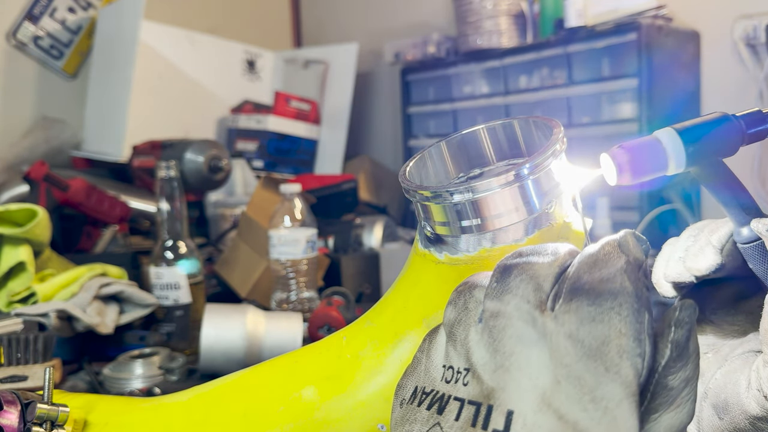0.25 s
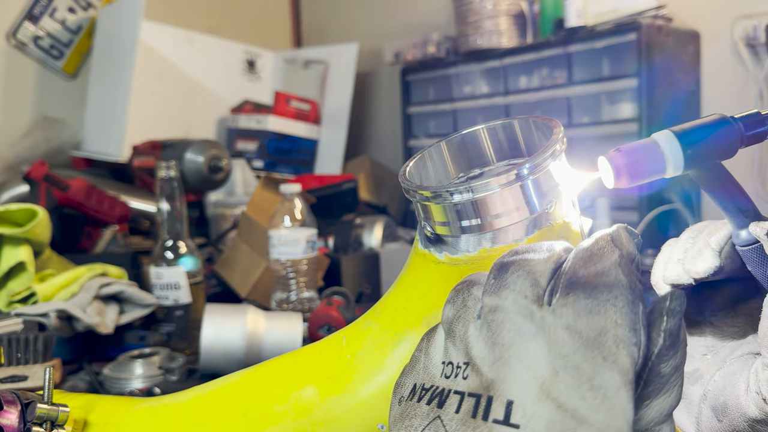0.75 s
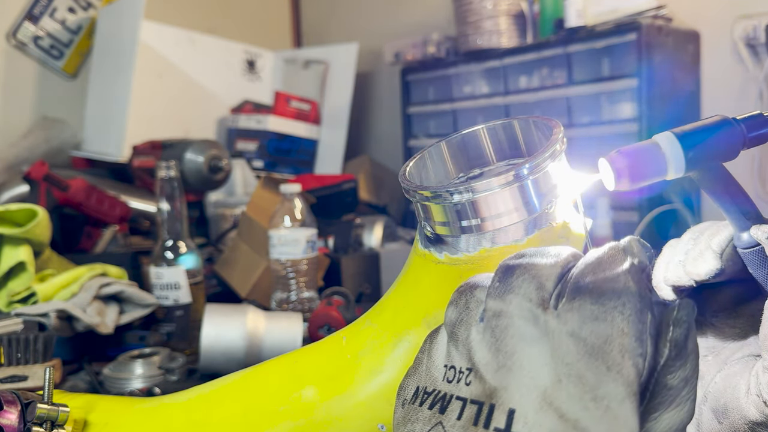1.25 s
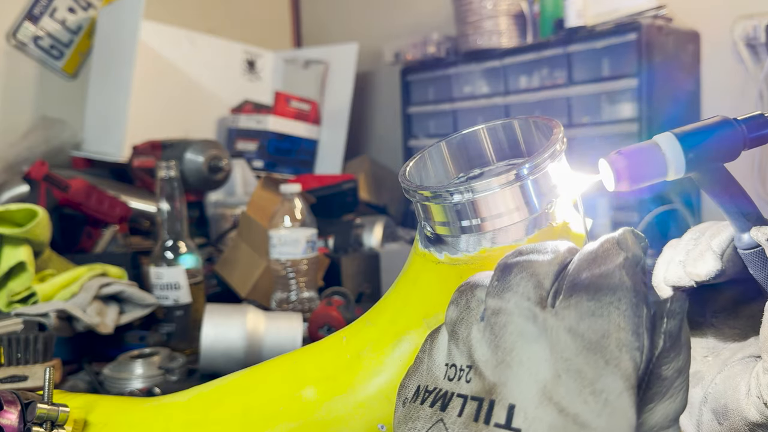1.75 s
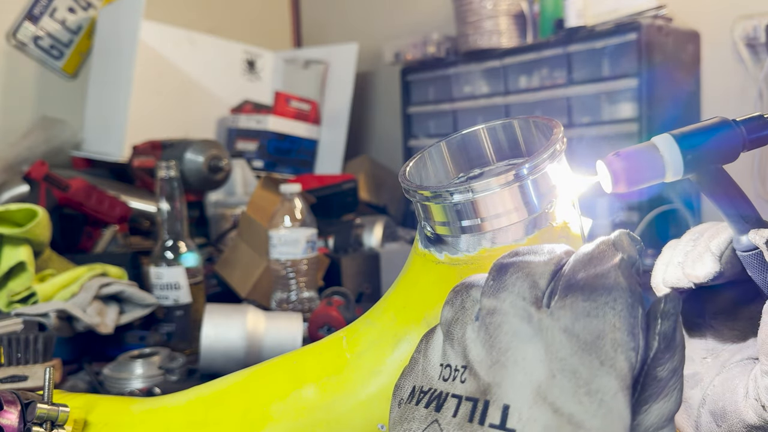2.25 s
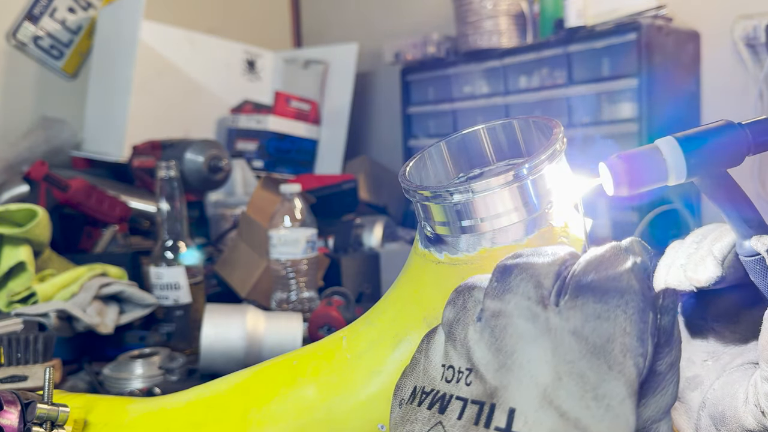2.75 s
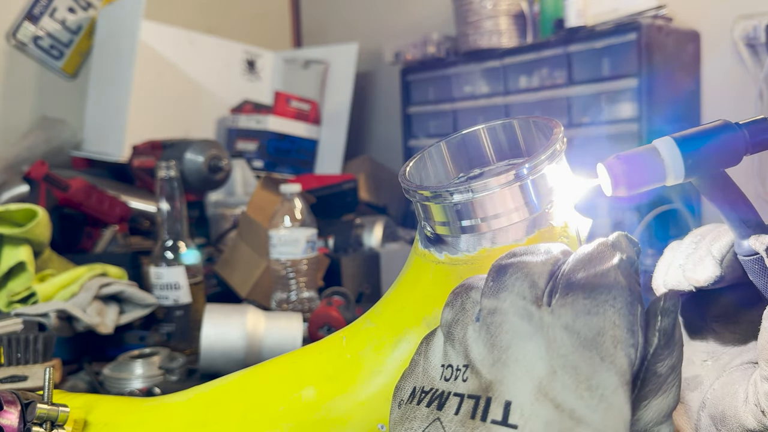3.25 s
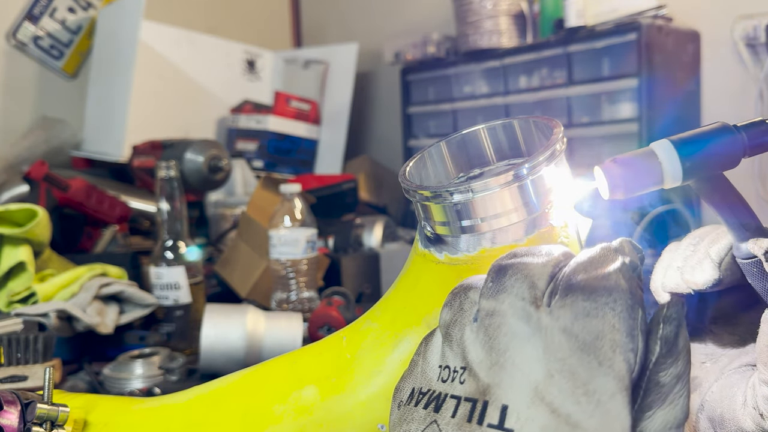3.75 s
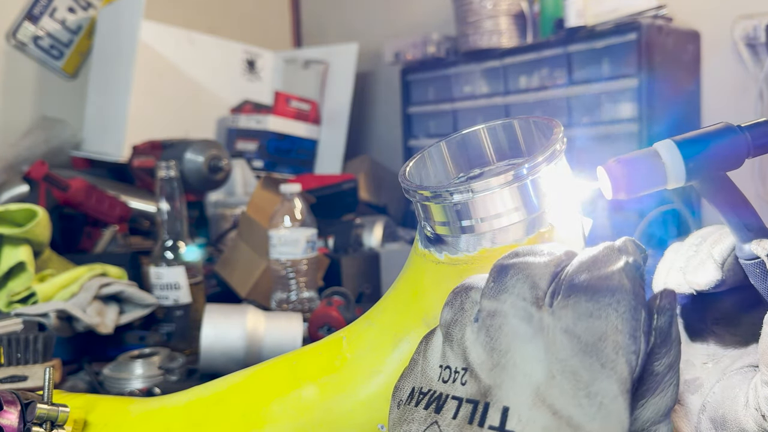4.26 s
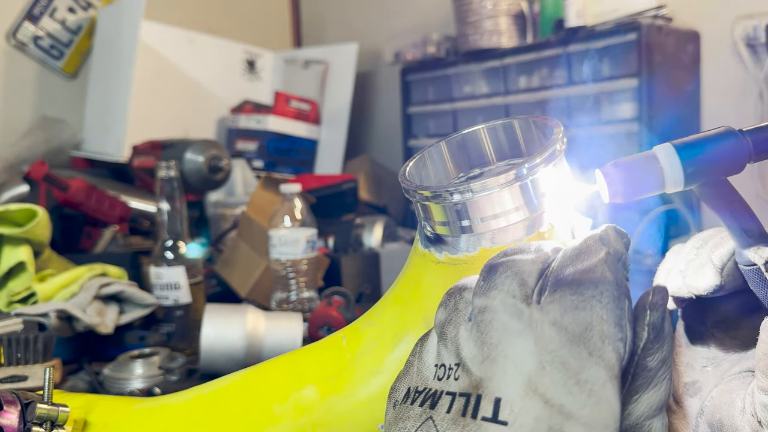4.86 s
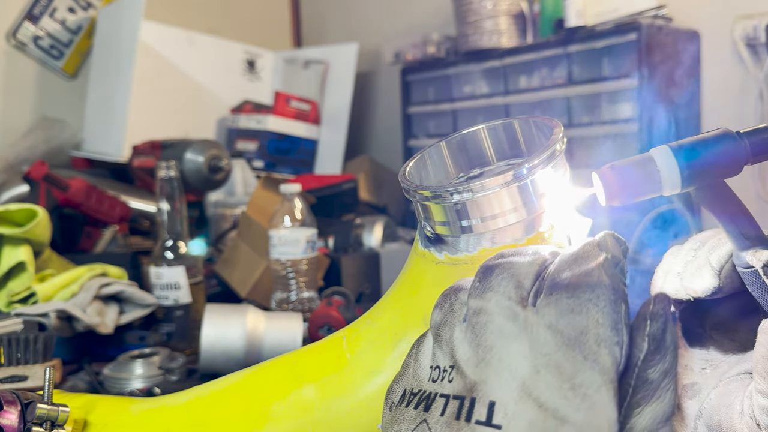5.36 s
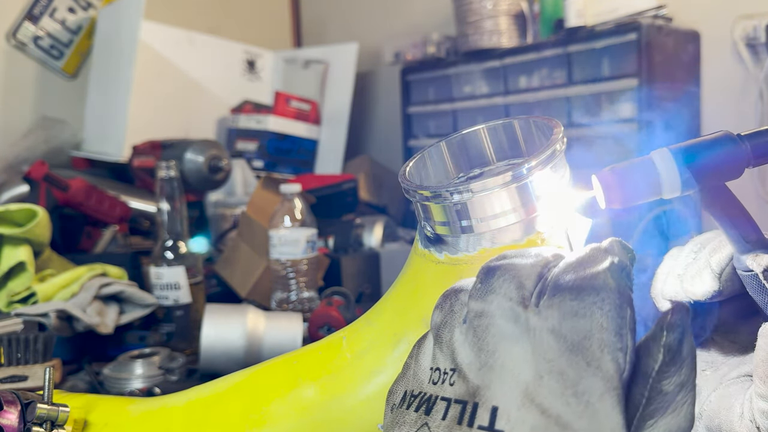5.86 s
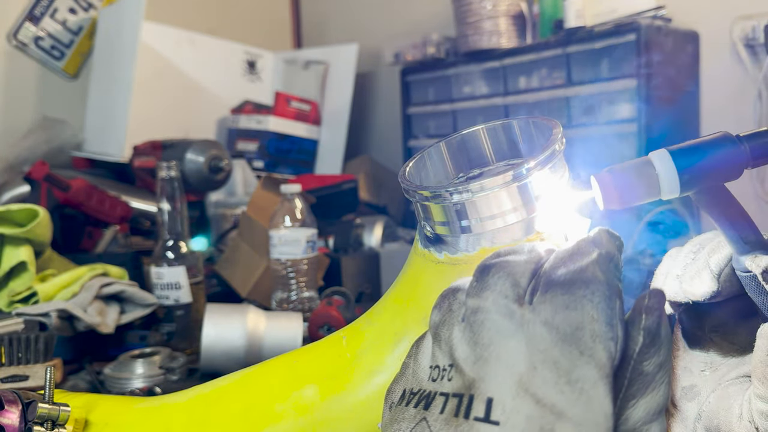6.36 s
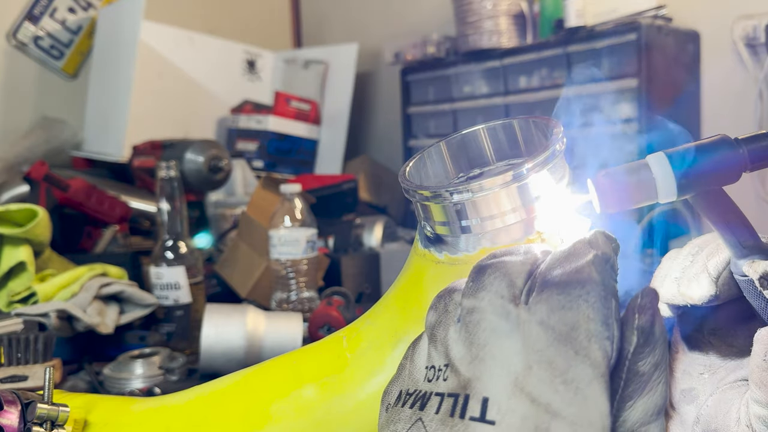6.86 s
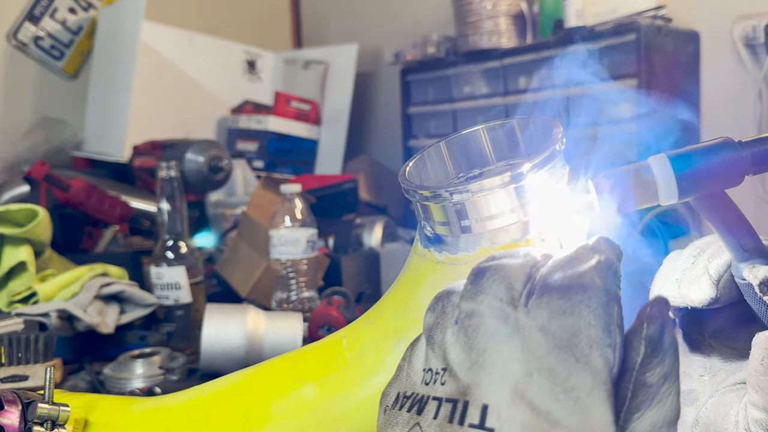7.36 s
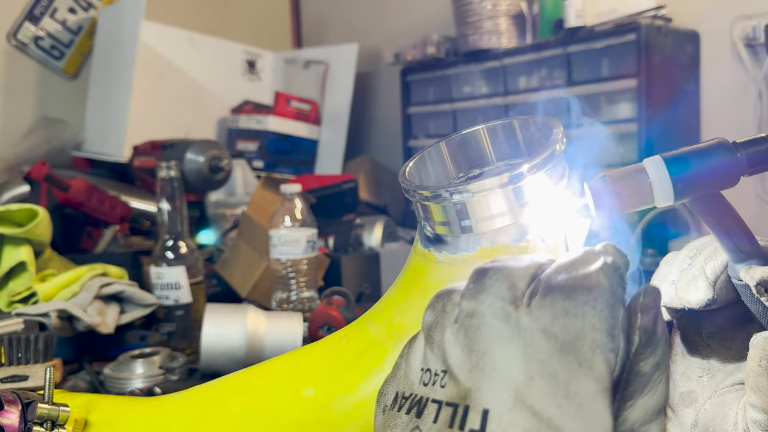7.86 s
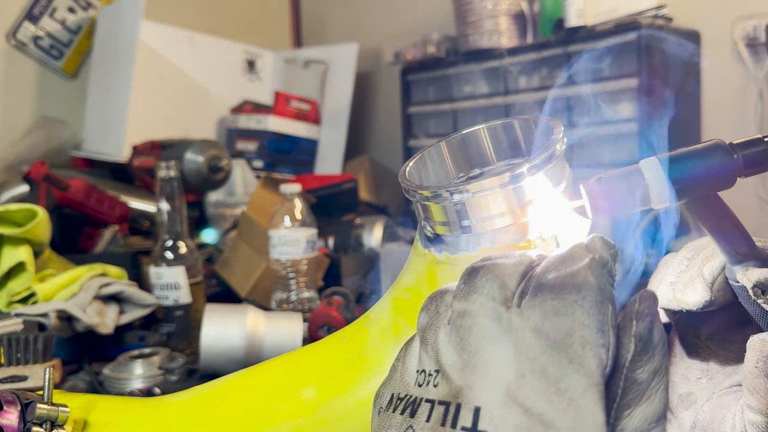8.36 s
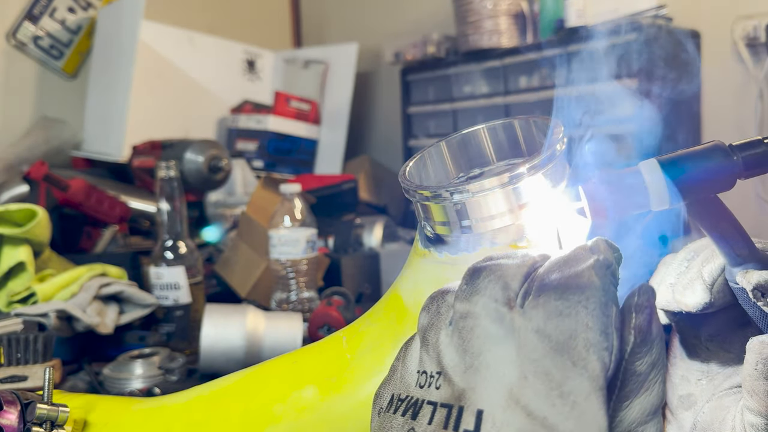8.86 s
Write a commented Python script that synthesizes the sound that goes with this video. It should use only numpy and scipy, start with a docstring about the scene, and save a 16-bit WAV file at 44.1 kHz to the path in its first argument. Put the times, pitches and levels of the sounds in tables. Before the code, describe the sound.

An electric welding arc buzzes harshly and steadily over hissing gas, with a few small spits and a faint machine hum.

```python
"""An AC TIG arc burns on an aluminium pipe, about half a metre from a phone on a cluttered bench.
From the start the current reverses twice a cycle, and each reversal snaps the hot gas into a hard buzz.
Shielding gas hisses and flutters; the welder hums, and its fan beats against the hum. From about 1.6 s
handling brings brief rumbles, from 3.5 s glove and filler rod bump the pipe, and from 4.3 s the arc
sometimes spits. Towards the end, as the pool heats, the rasp of the buzz gives way to sizzle."""
import sys
import numpy as np
from scipy import signal
from scipy.fft import rfft, irfft
from scipy.io import wavfile
from scipy.ndimage import uniform_filter1d

SR = 44100
rng = np.random.default_rng(int(sys.argv[2]) if len(sys.argv) > 2 else 0)


def materialize(psi):
    """Save the field psi as 16-bit PCM at rate SR to the path in sys.argv[1].

    A 1-D psi becomes a single channel; in a 2-D psi each row is a channel.
    """
    bounded = np.clip(np.atleast_2d(psi).T, -1, 1)
    quanta = np.round(bounded * 32767).astype(np.int16)
    wavfile.write(sys.argv[1], SR, quanta)


N = 401751

ARC_HZ, FIRST_SNAP_S, CLEANING_MS = 120.2595, .0036, 1.999
FAN_BLADE_HZ, FAN_BLADE_DB = 242.51, -54

# Spectra of the snap into the short cleaning part of the cycle and of the snap back.
# Each row: frequency in Hz, relative gain in dB.
SNAP_IN_SPECTRUM = [(700.0, -20), (1300.0, -15), (2000.0, -11), (3000.0, -10.5), (5800.0, -11),
                    (7700.0, 0.5), (9700.0, 1), (12000.0, -0.5), (16000.0, -6.5)]
SNAP_BACK_SPECTRUM = [(700.0, -28), (1300.0, -4.5), (1700.0, -2.5), (2500.0, 1.5), (4200.0, -2.5),
                      (7500.0, 0.5), (9300.0, 1), (12500.0, -3), (14500.0, 5), (16000.0, -2)]
# Short delayed copies that colour the buzz: near echoes, and two near 2 ms that shape the snaps.
# Each row: first delay in ms, last delay in ms, left gain, right gain.
DELAYED_COPIES = [(0.681, 0.654, 0.14, -0.3), (1.156, 0.63, -0.28, -0.03), (1.219, 1.211, -0.22, -0.19),
                  (1.715, 1.9, -0.23, -0.053), (1.931, 2.1, -0.18, 0.049), (2.068, 1.9, 0.05, 0.63),
                  (2.899, 2, 0.17, -0.12), (4.06, 4.068, 0.061, 0.0024)]
# Resonances of the pipe mouth and gas cup.
# Each row: frequency in Hz, bandwidth in Hz, first gain in dB, last gain in dB.
PIPE_MODES = [(1405, 160, -3, 5), (2346, 95, 1, 7), (2837, 94, 4, 7), (3266, 160, 5, 6),
              (3750, 147, -0.5, 7), (4390, 130, 3, 4), (4400, 92, 6, -5), (5160, 110, 3.5, -4.5),
              (5480, 130, -6, 8), (6290, 83, 2, 0.5), (6640, 270, 3.5, 6.5), (10900, 390, -4, 8.5)]
# Body of the buzz as the arc lengthens and shortens under the hand. Each row: time in seconds, level in dB.
ARC_LEVELS = [(0.05, -29), (0.37, -28.5), (0.47, -29.5), (1.33, -28), (2.11, -30.5), (2.85, -28),
              (4.06, -30.5), (4.23, -27.5), (5.24, -30.5), (5.36, -29), (5.46, -30), (6.24, -28),
              (6.59, -30), (7.65, -28), (8.07, -32), (8.9, -30), (9.05, -30.5)]
# Upper bands of the buzz, from low to high. Each holds: first level in dB, last level in dB,
# exponent of the drift, share of the arc's swing, flicker in dB.
RASP_BAND = (-27.5, -33.5, 2.5, 0.87, 0.42)
BITE_BAND = (-30, -30.4, -0.26, 0.4, 0.45)
SIZZLE_BAND = (-31.5, -29.4, 1.4, 0, 0.72)
# Spectra of gas hiss, of low flutter and rumble, and of air through the fan.
# Each row: frequency in Hz, relative gain in dB.
HISS_SPECTRUM = [(600, -15), (1600, -6.5), (2300, 4), (3800, -1), (4800, 0.5), (8000, -2.5), (12000, 0.5),
                 (15500, -18)]
RUMBLE_SPECTRUM = [(20, -3), (60, 0), (150, -1), (400, -11), (900, -15), (3000, -37)]
FAN_AIR_SPECTRUM = [(25, -28), (60, -19), (100, -8.5), (140, -8), (200, 0), (260, -2), (330, -8),
                    (500, -10.5), (900, -15), (2000, -8.5), (8000, -24.5)]
# The welder's hum. Each row: multiple of the arc rate, first base level in dB, last base level in dB.
HUM_HARMONICS = [(1, -63.5, -69), (2, -56.5, -57), (3, -58.5, -54), (4, -70, -59.5), (5, -63.5, -63.5),
                 (6, -73.5, -63), (8, -70, -63.5), (9, -66.5, -62)]
# Brief swells of low rumble from glove rubs and handling.
# Each row: middle in seconds, length in seconds, level in dB.
HANDLING_RUMBLES = [(1.65, .2, -62), (3.32, .14, -56), (3.56, .28, -60), (4.0, .12, -62), (4.82, 0.34, -54),
                    (5.52, .2, -62), (6.24, .2, -61), (7.07, .1, -55), (8.37, .08, -58)]
# Touches of glove and filler rod on the pipe. Each row: start in seconds, relative peak level in dB.
BUMP_EVENTS = [(3.472, -43.5), (4.709, -43), (4.77, -47), (4.869, -50), (5.789, -54), (7.045, -53),
               (8.052, -50), (8.351, -54)]
# Spectrum of a touch. Each row: frequency in Hz, relative gain in dB.
BUMP_SPECTRUM = [(60, -3), (250, 1), (600, -1.5), (1000, -5), (3000, -23)]
# Hard re-strikes of the arc. Each row: time in seconds, level in dB above the usual snap.
ARC_SPITS = [(4.328, 4), (4.378, 4), (4.394, 3), (4.91, 5), (4.935, 5.5), (6.141, 3), (6.216, 4),
             (7.895, 4), (7.978, 4), (8.045, 4.5), (8.069, 4.5)]


def undb(db):
    """Amplitude grows tenfold for every 20 dB."""
    return 10 ** (np.asarray(db) / 20)


def level(x, db):
    """Scaling by the rms of the channel mean brings a signal to a level in dB."""
    return x * undb(db) / np.sqrt(np.mean(np.atleast_2d(x).mean(axis=0) ** 2))


def drift(first, last, exponent=1):
    """A power law leads from first to last; with a negative exponent it arrives from beyond last."""
    return first + (last - first) * np.linspace(0, 1, N) ** exponent


def walk(rate_hz):
    """Smoothing random steps gives a slow wander with a spread near 1."""
    hold = int(SR / rate_hz)
    steps = np.repeat(rng.standard_normal(N // hold + 1), hold)
    return 1.3 * uniform_filter1d(uniform_filter1d(steps, hold), hold)[:N]


def below(f, hz, order):
    """A low-pass slope gives the share of each frequency that lies below a crossover."""
    return 1 / (1 + (f / hz) ** order)


def lag(f, ms):
    """A pure delay turns the phase in proportion to frequency."""
    return np.exp(-2j * np.pi * f * ms / 1000)


def shape(x, response, size=2048):
    """Convolution with its inverse transform imposes a frequency response."""
    taps = np.roll(irfft(response(np.fft.rfftfreq(size, 1 / SR))), size // 2, axis=-1)
    return signal.oaconvolve(np.atleast_2d(x), np.atleast_2d(taps), axes=1)[:, size // 2:size // 2 + N]


def colour(x, spectrum, size=2048):
    """A minimum-phase filter imposes a spectrum while clicks keep their sharp front."""
    hz, db = np.transpose(spectrum)
    gain = undb(np.interp(np.log(np.fft.rfftfreq(size, 1 / SR) + 1), np.log(hz), db))
    cepstrum = irfft(np.log(gain))
    cepstrum[1:size // 2] *= 2
    cepstrum[size // 2 + 1:] = 0
    taps = irfft(np.exp(rfft(cepstrum)))
    return signal.oaconvolve(np.atleast_2d(x), taps[None], axes=1)[:, :N]


def clicks(times, sizes, reach=8):
    """A windowed sinc places each band-limited impulse between the samples."""
    at = times[:, None] * SR
    index = at.astype(int) + np.arange(1 - reach, reach + 1)
    taps = sizes[:, None] * np.sinc(index - at) * np.cos(np.pi * (index - at) / (2 * reach)) ** 2
    return np.bincount(np.clip(index, 0, N).ravel(), taps.ravel(), N + 1)[:N]


def stereo_noise(side_db):
    """Independent mid and side noises leave the two channels partly correlated."""
    mid, side = rng.standard_normal((2, N))
    return mid + undb(side_db) * np.array([side, -side])


def snaps(start_s, spectrum, scatter_db, jitter_us, fizz_db, fizz_scatter_db, fizz_ms):
    """Each re-strike sends out a slightly different pressure pulse, with a fizz as oxide breaks up."""
    times = np.arange(start_s, N / SR, 1 / ARC_HZ)
    size, timing, fizz_size = rng.standard_normal((len(times), 3)).T
    times = times + timing * jitter_us / 1e6
    pulses = clicks(times, undb(scatter_db * size))
    fizz_onsets = clicks(times, undb(fizz_db + fizz_scatter_db * fizz_size))
    fade = np.exp(-1000 / (fizz_ms * SR))
    envelope = signal.lfilter([np.sqrt(1 - fade ** 2)], [1, -fade], fizz_onsets)
    fizz = shape(envelope * rng.standard_normal(N), lambda f: 1 - below(f, hz=5000, order=2))
    return colour(pulses + fizz, spectrum)


def comb_colour(x, dip_hz, dip_width_hz):
    """A small source radiates little bass; delayed copies comb the rest, and one narrow band is missing."""
    def direct(f):
        dip = (dip_hz ** 2 - f ** 2) / (dip_hz ** 2 - f ** 2 + 1j * dip_width_hz * f)
        return dip * (1 - below(f, hz=980, order=6))

    def comb(f, column):
        return 1 + sum(np.array(row[2:])[:, None] * lag(f, row[column]) for row in DELAYED_COPIES)
    x = shape(x, direct)
    travel = drift(0, 1)  # one comb fades into the other as the torch travels
    return (1 - travel) * shape(x, lambda f: comb(f, 0)) + travel * shape(x, lambda f: comb(f, 1))


def pipe(x):
    """Each resonance lifts or cuts its band and rings briefly; its gain drifts as the torch travels."""
    out = x
    for hz, width_hz, first_db, last_db in PIPE_MODES:
        band = signal.lfilter(*signal.iirpeak(hz, hz / width_hz, fs=SR), x)
        out = out + (undb(drift(first_db, last_db)) - 1) * band
    return out


def workshop(x, wet_db, t60_s):
    """Diffuse reflections from walls and shelves add a weak tail that decays exponentially."""
    t = np.arange(SR // 3) / SR
    mid, side = rng.standard_normal((2, len(t))) * np.exp(-np.log(1000) * t / t60_s) * (t > .002)
    tail = mid + .8 * np.array([side, -side])
    tail = tail / np.sqrt((tail ** 2).sum(axis=1, keepdims=True))
    return x + undb(wet_db) * signal.fftconvolve(x, tail, axes=1)[:, :N]


def microphones(x, right_db, split_hz, smear_ms):
    """Level and time cues put the arc on the right: louder mid-range, earlier and inverted treble."""
    def response(f):
        low = below(f, hz=split_hz, order=8)
        right = low * undb(right_db) - (1 - low) * lag(f, ms=-.317)
        # dispersion: the treble passes first, so each snap becomes a tiny falling chirp
        chirp = np.exp(2j * np.pi * smear_ms / 1000 * split_hz * np.exp(-f / split_hz))
        return chirp * np.array([np.ones_like(f), right])
    return shape(x, response)


def arc_length_db():
    """The level of the buzz follows the length of the arc."""
    return np.interp(np.arange(N) / SR, *np.transpose(ARC_LEVELS))


def weld_pool(buzz):
    """The pool modulates the buzz: less steady as it widens, with treble flickering as it moves."""
    body, to_rasp, to_bite = (shape(buzz, lambda f: below(f, hz, order=24)) for hz in (4100, 7000, 9500))
    body_db = arc_length_db() + drift(0.29, 0.45) * walk(rate_hz=14)
    swing_db = body_db - body_db.mean()
    flicker = walk(rate_hz=35)
    out = level(body, body_db + 0.069)
    bands = (to_rasp - body, RASP_BAND), (to_bite - to_rasp, BITE_BAND), (buzz - to_bite, SIZZLE_BAND)
    for band, (first_db, last_db, exponent, share, flicker_db) in bands:
        band_db = drift(first_db, last_db, exponent) + share * swing_db + flicker_db * flicker
        out = out + level(band, band_db)
    return out


def arc():
    """Two pressure pulses of opposite sign repeat every cycle and fuse into a harmonic buzz."""
    into = snaps(FIRST_SNAP_S, SNAP_IN_SPECTRUM, scatter_db=0.74, jitter_us=3.5,
                 fizz_db=-7.5, fizz_scatter_db=4.0, fizz_ms=0.57)
    back = snaps(FIRST_SNAP_S + CLEANING_MS / 1000, SNAP_BACK_SPECTRUM, scatter_db=0.53, jitter_us=1.7,
                 fizz_db=-12, fizz_scatter_db=0.0, fizz_ms=1.0)
    buzz = level(into, db=0) * spit_gain() - level(back, db=-.7)
    buzz = pipe(comb_colour(buzz, dip_hz=4000, dip_width_hz=180))
    buzz = workshop(buzz, wet_db=-15.5, t60_s=.25)
    buzz = microphones(buzz, right_db=3.5, split_hz=7500, smear_ms=0.897)
    return weld_pool(buzz)


def gas_hiss():
    """Turbulence makes broadband noise as the shielding gas leaves the cup."""
    return level(colour(stereo_noise(side_db=2), HISS_SPECTRUM), db=-36.5)


def low_rumble():
    """Soft gas flutter and brief swells from glove rubs and handling add in power."""
    t = np.arange(N) / SR
    flutter = undb(drift(-71, -63) + 2.5 * walk(rate_hz=6))
    handling = sum(undb(db) * np.exp(-(2 * (t - middle_s) / length_s) ** 2)
                   for middle_s, length_s, db in HANDLING_RUMBLES)
    return np.hypot(flutter, handling) * level(colour(stereo_noise(side_db=-8), RUMBLE_SPECTRUM), db=0)


def welder():
    """Over rushing air, the fan's blade tone beats with the hum's second harmonic, 2 Hz away."""
    phase_per_hz = 2 * np.pi * np.arange(N) / SR
    arc_db = arc_length_db()
    # harmonics above the second follow part of the arc's swing and waver together
    swell_db = 0.77 * (arc_db - arc_db.mean()) + 1.4 * walk(rate_hz=2.58)
    hum = 0
    for multiple, first_db, last_db in HUM_HARMONICS:
        db = drift(first_db, last_db) + (multiple > 2) * swell_db + 0.76 * walk(rate_hz=4.5)
        hum = hum + undb(db) * np.sin(multiple * ARC_HZ * phase_per_hz)
    blade = -undb(FAN_BLADE_DB) * np.sin(FAN_BLADE_HZ * phase_per_hz + .25 * walk(rate_hz=2))
    tones = np.sqrt(2) * (hum + blade) * undb([[-1.3], [1.1]])  # a little to the right
    air = level(colour(stereo_noise(side_db=-9), FAN_AIR_SPECTRUM), db=-50)
    return tones + air


def bumps(decay_s, gain_db):
    """A soft contact excites mostly low frequencies: each touch is a dull, quickly damped scuff."""
    times, db = np.transpose(BUMP_EVENTS)
    envelope = signal.lfilter([1], [1, -np.exp(-1 / (decay_s * SR))], clicks(times, undb(db)))
    return envelope * level(colour(stereo_noise(side_db=-7), BUMP_SPECTRUM), gain_db)


def spit_gain():
    """Where oxide or filler disturbs the arc, it re-strikes harder and one pressure pulse grows."""
    t = np.arange(N) / SR
    return undb(sum(db * (abs(t - time_s) < .5 / ARC_HZ) for time_s, db in ARC_SPITS))


def scene():
    """The pressures from arc, gas, machine and hands add by superposition."""
    return arc() + low_rumble() + gas_hiss() + welder() + bumps(decay_s=0.019, gain_db=3.5)


def record(dry):
    """A steep low-pass filter in the phone limits the bandwidth to 15.7 kHz."""
    return signal.sosfilt(signal.ellip(10, .1, 80, 15700, fs=SR, output="sos"), dry)


dry = scene()
out = record(dry)
materialize(out)
```